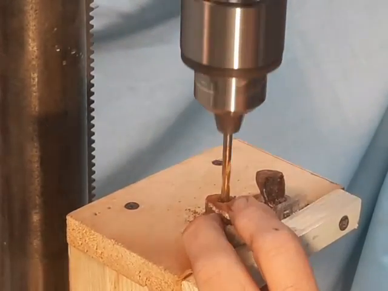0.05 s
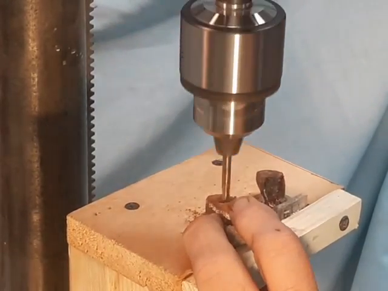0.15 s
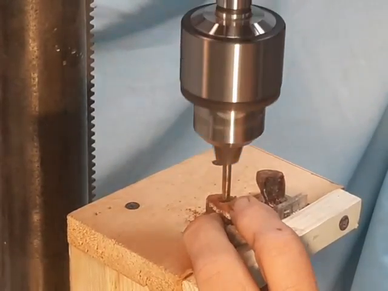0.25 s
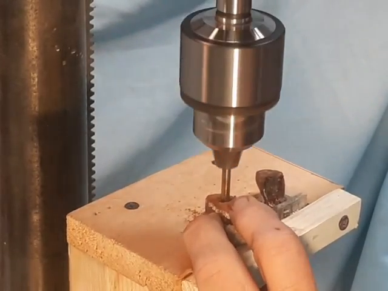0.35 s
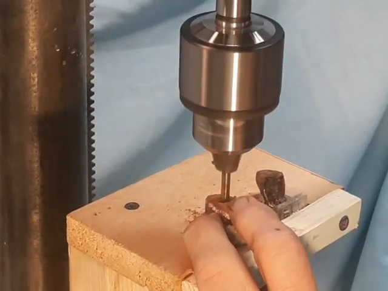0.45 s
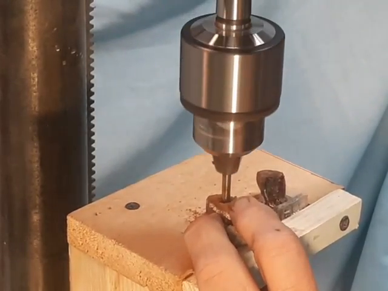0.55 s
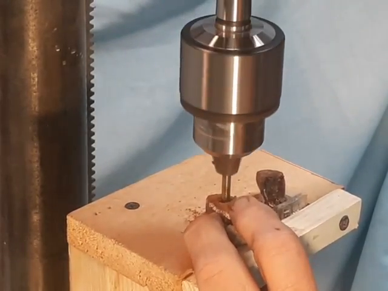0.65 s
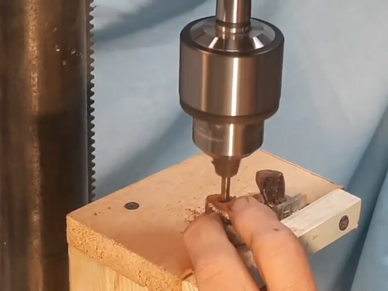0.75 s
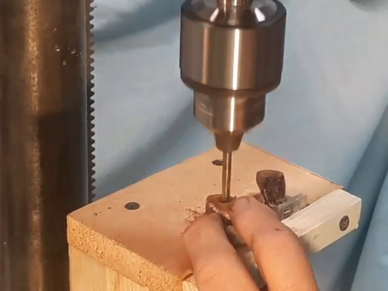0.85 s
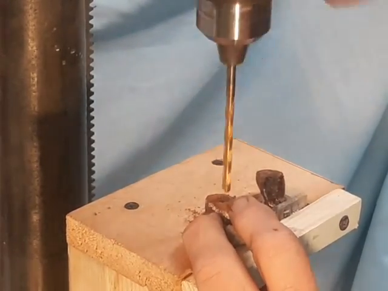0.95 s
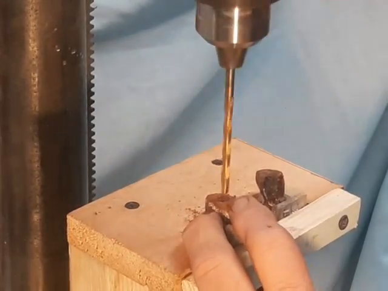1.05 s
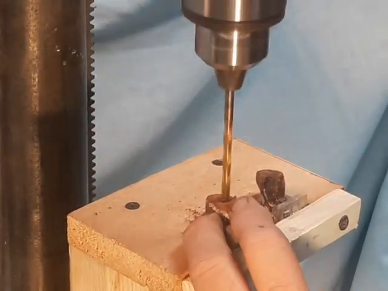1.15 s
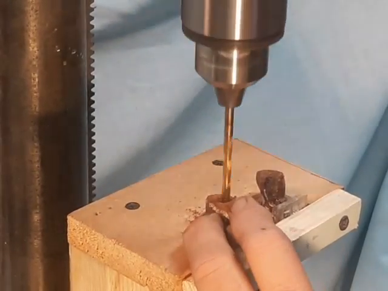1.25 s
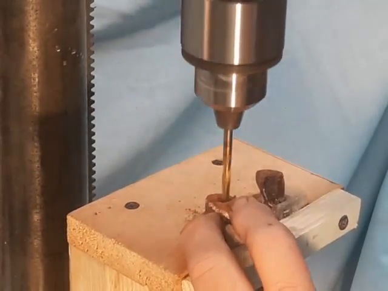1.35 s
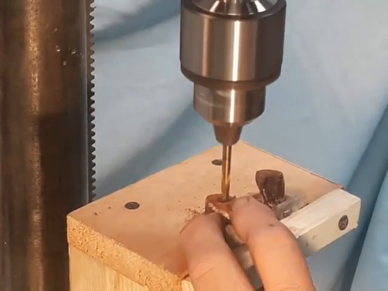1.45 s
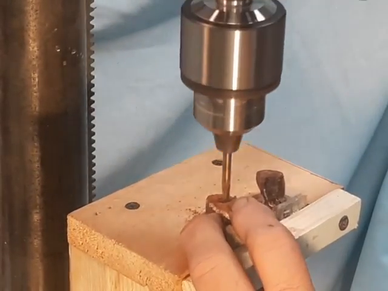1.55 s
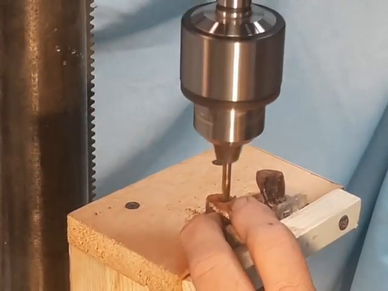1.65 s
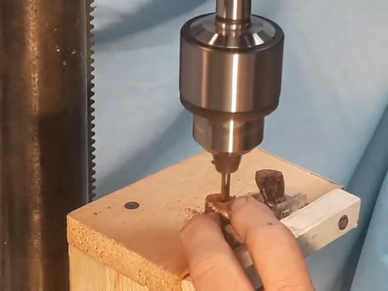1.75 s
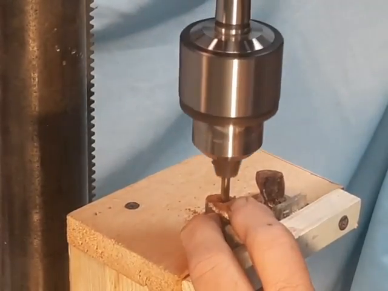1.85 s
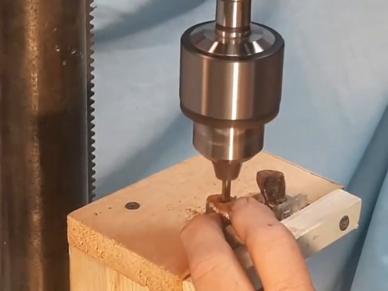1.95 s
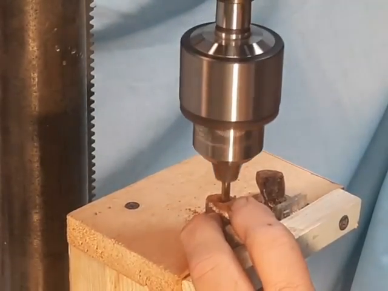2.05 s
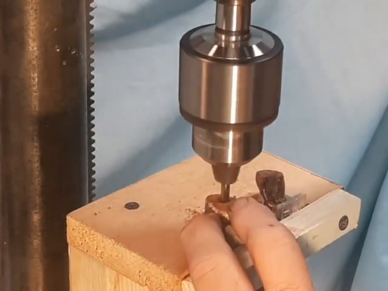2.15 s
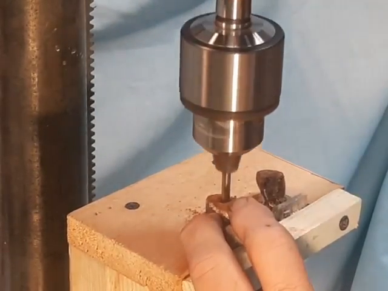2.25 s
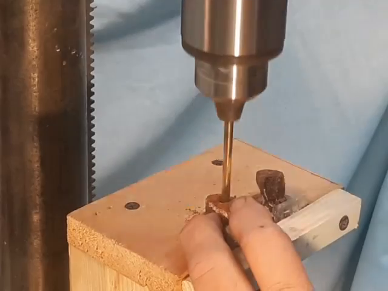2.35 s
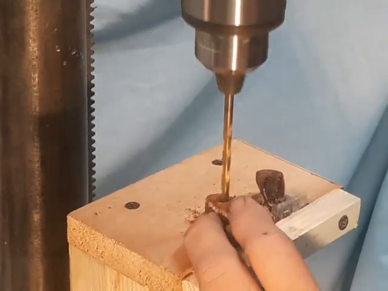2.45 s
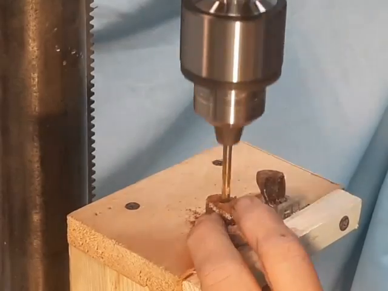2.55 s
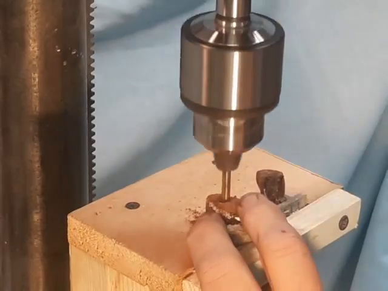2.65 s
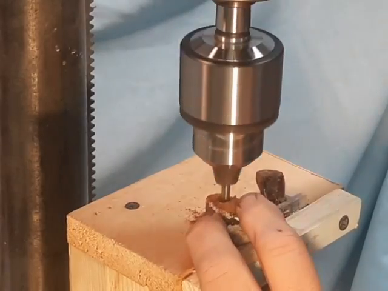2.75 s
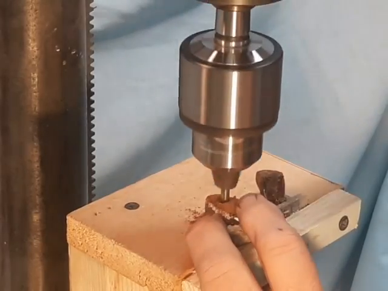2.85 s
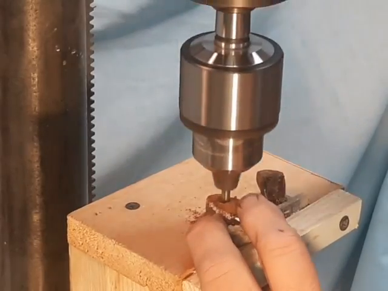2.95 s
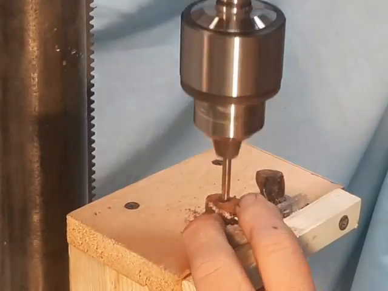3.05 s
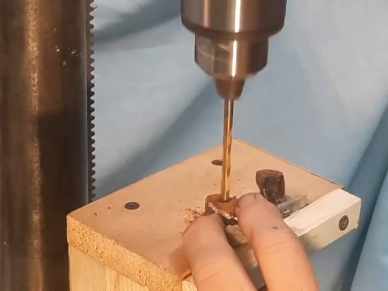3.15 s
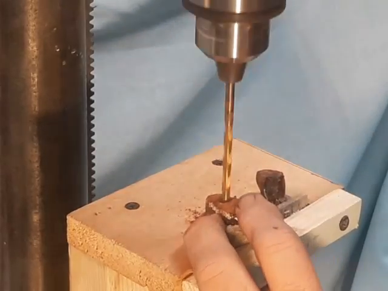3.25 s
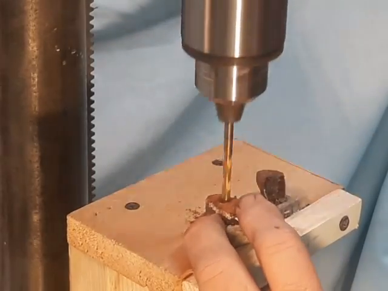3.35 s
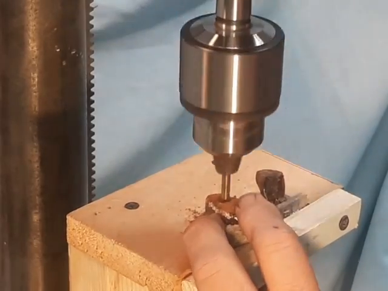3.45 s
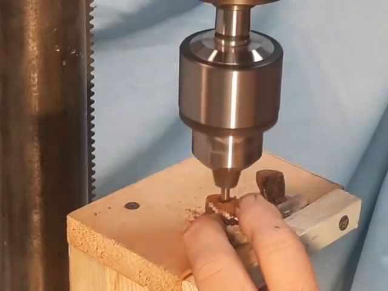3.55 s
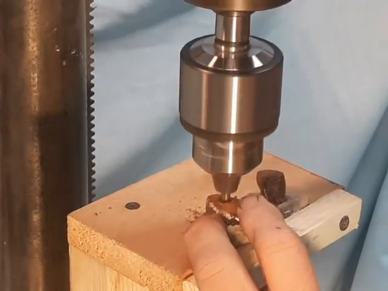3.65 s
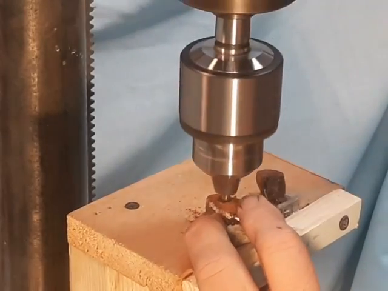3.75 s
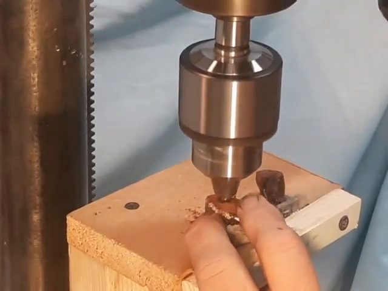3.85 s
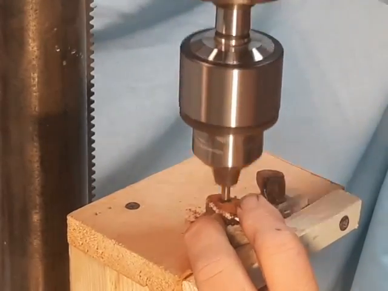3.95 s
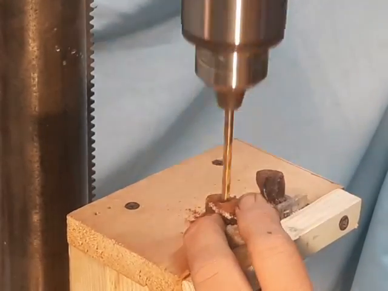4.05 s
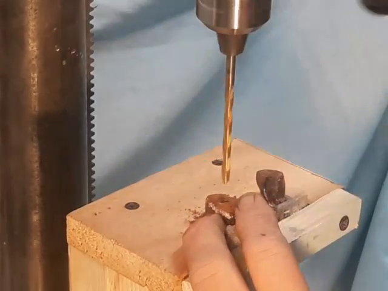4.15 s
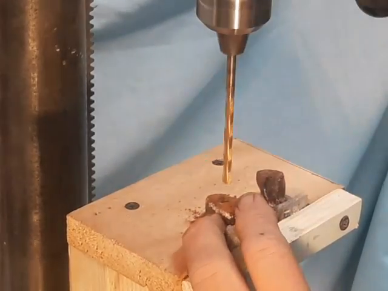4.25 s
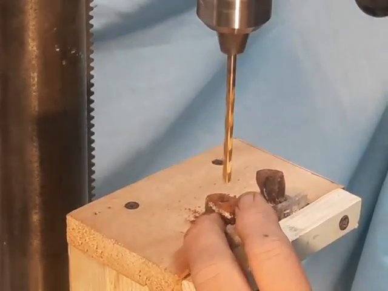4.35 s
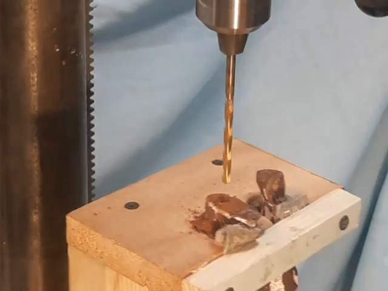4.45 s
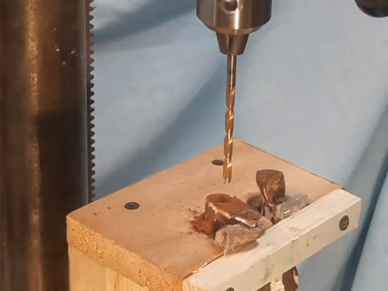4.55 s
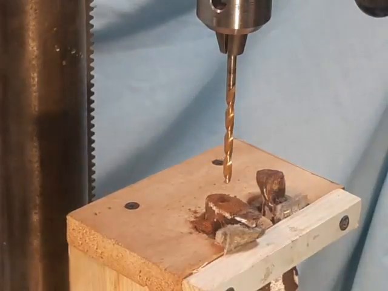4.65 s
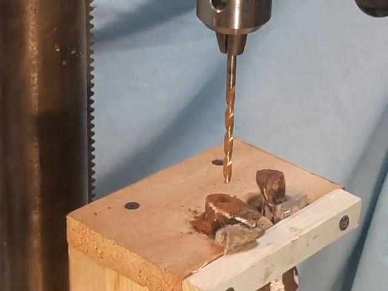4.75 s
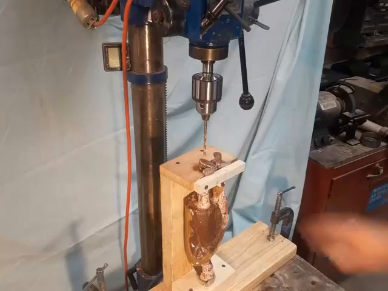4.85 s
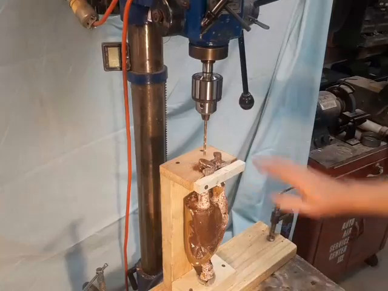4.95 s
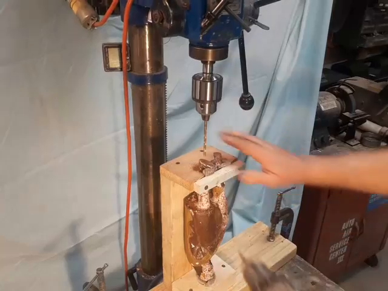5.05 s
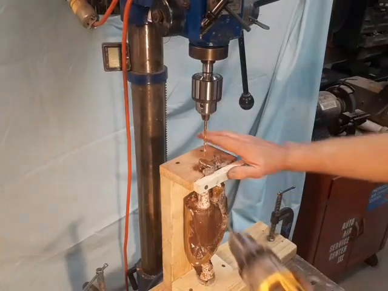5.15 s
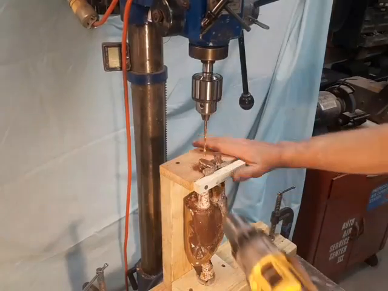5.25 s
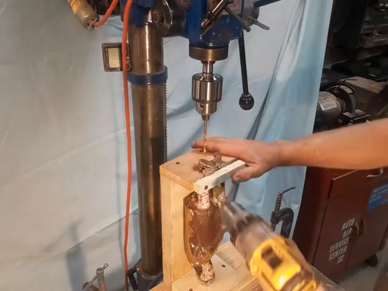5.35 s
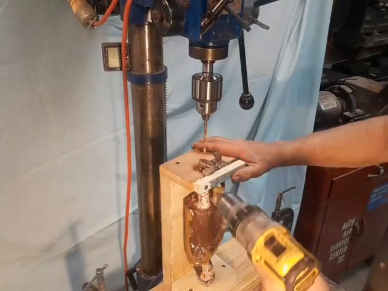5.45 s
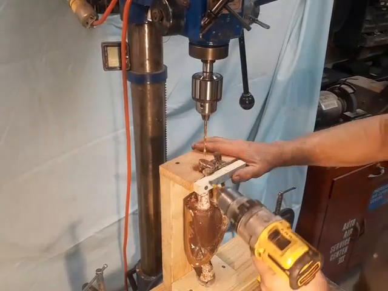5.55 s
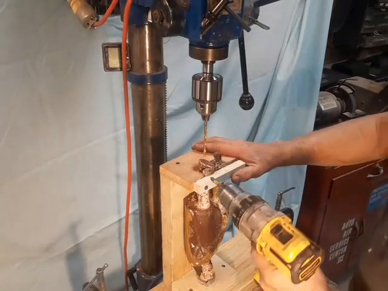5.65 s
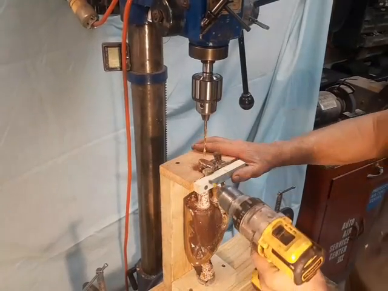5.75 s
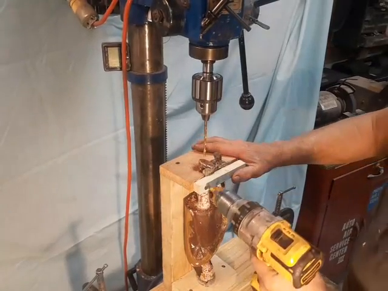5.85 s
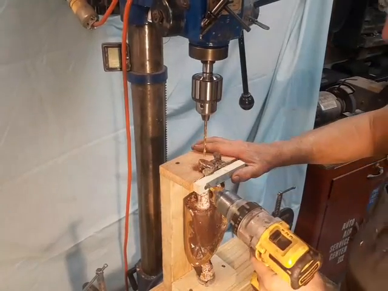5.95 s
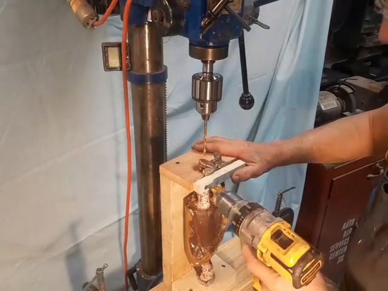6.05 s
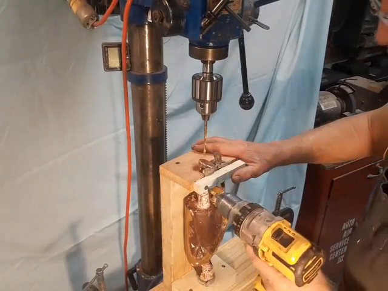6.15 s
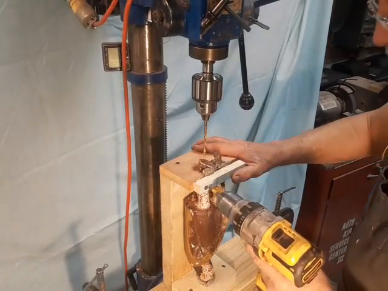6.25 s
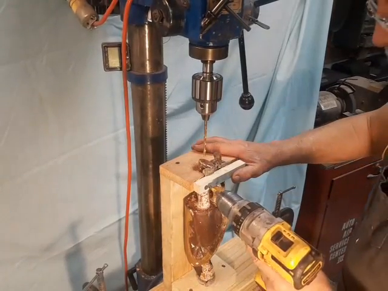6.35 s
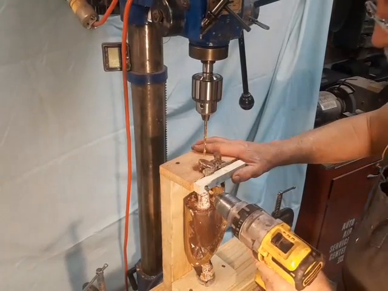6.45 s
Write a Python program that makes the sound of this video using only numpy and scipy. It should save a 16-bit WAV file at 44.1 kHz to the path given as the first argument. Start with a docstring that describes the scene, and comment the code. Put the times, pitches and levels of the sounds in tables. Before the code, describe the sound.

A humming drill press bores into wood with high squeaks and stops, then a cordless driver's bit clicks and scrapes on a screw.

```python
"""A drill press pecks a thin bit into a small piece of wood, in a small workshop. Its motor hums, its
belt and bearings rumble, and the bit's flutes (spiral grooves) rub and hiss. At times the bit sticks
and slips, squeaking once a turn. The press falls silent. A hand lands on the wooden jig (the holder
for the work) and slides over it. Then the steel bit of a cordless driver clicks and scrapes against
a screw in the jig, which thuds along."""
import sys
import numpy as np
from scipy import signal
from scipy.fft import rfft, irfft, next_fast_len
from scipy.io import wavfile
from scipy.ndimage import uniform_filter1d

SR = 44100
rng = np.random.default_rng(int(sys.argv[2]) if len(sys.argv) > 2 else 0)


def int16_out(signal):
    """Quantize to a 16-bit WAV file."""
    q = np.round(np.clip(np.atleast_2d(signal).T, -1, 1) * 32767)
    wavfile.write(sys.argv[1], SR, q.astype(np.int16))


N = 287091
TIME = np.arange(N) / SR
SPINDLE_HZ = 47.2   # turns of the drill bit each second


def drill_press():
    """The running machine; its rattle and hiss swell once with every turn of the bit."""
    rumble, rattle, hum, hiss = press_levels()
    turn = np.sin(wavering_phase(SPINDLE_HZ, wobble=0.013, rate=2.1))
    return belt(rumble) + bearings(rattle, turn) + motor(hum) + flutes(hiss, turn) + binding_bit()


# Spells when the hum swells and the rumble, rattle and hiss grow louder:
# (start [s], swell lasts [s], rubbing lasts [s], rubbing [dB], rattle rise [dB])
SURGES = [(-0.03, .36, 0.45, -62.5, 3), (0.51, .62, .66, -58.5, 3), (1.29, 0.27, 0.24, -59.5, 2.5),
          (2.02, 0.2, .23, -58, 2), (2.55, .14, 0.385, -59.5, 2.5), (3.38, 0.12, 0.604, -60.5, 2.5),
          (4.33, 0.081, 0.13, -64, 1.2)]
# Dull thuds of the feed, which lowers the bit: (time [s], level [dB])
FEED_THUDS = [(0.57, -56), (2.11, -57), (3.41, -52.5), (4.48, -48)]
# Brief rasps of the flutes and the feed: (time [s], level [dB])
BRIEF_RASPS = [(0.532, -54), (2.17, -51.5), (2.775, -54.5), (4.425, -55), (4.524, -60)]


def press_levels():
    """Loudness over time: rumble, rattle, hum and hiss rise in surges; at the stop all die away."""
    swell, rattle_db, rub_power = 0, -53.5, from_db(-59.5) ** 2   # between surges
    for start, swell_s, rub_s, rub_db, rise_db in SURGES:
        swelling = gate(start, start + swell_s, ramp_s=0.09)
        rubbing = gate(start, start + rub_s, ramp_s=0.083)
        swell = swell + swelling
        rattle_db = rattle_db + rise_db * (swelling + rubbing) / 2
        rub_power = rub_power + (from_db(rub_db) * rubbing) ** 2
    stop_s = 4.485
    running = dying(stop_s, db_per_s=295)
    rumble_power = from_db(-53 + 1.5 * swell) ** 2 + bumps(FEED_THUDS, length_s=0.055)
    rumble = np.sqrt(rumble_power) * dying(stop_s, db_per_s=225)
    hum = from_db(-67) * (1 + (from_db(12) - 1) * swell) * running
    rub_power = rub_power * dying(4.46, db_per_s=252) ** 2   # the hiss fades first
    hiss = np.sqrt(rub_power + bumps(BRIEF_RASPS, length_s=0.031))
    return rumble, from_db(rattle_db) * running, hum, hiss


def motor(level):
    """The motor hums at the mains hum pitch, slightly out of step between the ears."""
    phase = wavering_phase(hz=119.7, wobble=0.0027, rate=8)
    return level * np.sin(phase + np.array([[0], [0.9]]))


# Tone colour of the belt's rumble: (frequency [Hz], level [dB])
BELT_SPECTRUM = [(30, -44), (60, -25), (100, -19.5), (150, -14), (200, -8.5), (250, 0.5), (330, -1.5),
                 (430, -1), (520, -3.5), (620, -6.5), (760, -10.5), (900, -10.5)]


def belt(level):
    """The drive belt makes a low, unsteady rumble, louder on the right."""
    flutter = from_db(0.5 + 1.84 * drift(40))
    return level * flutter * coloured(BELT_SPECTRUM, alike=0.058) * ears(1, 2.6)


# Tone colour of the bearings' rattle: (frequency [Hz], level [dB])
BEARING_SPECTRUM = [(410, -32), (700, -6), (753, -10), (851, -7), (1100, -0.5), (1310, -11.5), (1630, -6.5),
                    (2010, -9.5), (2130, -10.5), (2240, -6.5), (2350, -5.5), (2620, -10), (3000, -22.5),
                    (3900, -56), (6600, -120)]
# Ringing notes of the press's metal body: (pitch [Hz], width [Hz], level [dB])
BODY_NOTES = [(473, 4.4, -6.5), (681, 19, -16.5), (1020, 49, -10), (1102.6, 22, -9.5), (2303, 42, -9.5)]


def bearings(level, turn):
    """The bearings rattle, while loose parts knock unevenly and keep the metal body ringing."""
    flutter = from_db(-1.24 + drift(120) + 0.31 * turn)
    rattle = flutter * coloured(BEARING_SPECTRUM, alike=0.0079)
    knocking = from_db(3.33 * drift(60)) * stereo_noise(0.17)
    body = sum(from_db(db) * rms_one(resonate(knocking, hz, width)) for hz, width, db in BODY_NOTES)
    return level * (rattle + body) * ears(0.6, 2.8)


# Tone colour of the flutes' hiss: (frequency [Hz], level [dB])
FLUTE_SPECTRUM = [(1470, -48), (2500, -4), (2810, -7.5), (3130, -5.5), (4440, 0.5), (5150, -5.5), (5560, 0),
                  (6350, 1), (6700, 0.5), (7710, -13), (9360, -14.5), (11400, -9), (13300, -10.5),
                  (15200, -11), (16000, -14.5)]


def flutes(level, turn):
    """The bit's spiral grooves rub the wood and hiss, swelling once a turn."""
    return level * from_db(8.5 + 1.3 * drift(200) + turn) * coloured(FLUTE_SPECTRUM, alike=0.014)


# Times when the bit is tight in the hole: (start [s], end [s], final level [dB])
TIGHT_SPELLS = [(2.78, 3.001, -47), (3.557, 3.968, -40.5)]
# The thin bit's own ringing note: (pitch [Hz], width [Hz], level [dB])
DRILL_BIT_NOTE = [(5140, 870, -6.5)]


def binding_bit():
    """Deep in the hole the bit rubs and sings roughly, ever louder until it is lifted."""
    hz, width, ring_db = DRILL_BIT_NOTE[0]
    singing = rms_one(resonate(resonate(stereo_noise(0.12), hz, width), hz, width))
    growth_db_per_s = 26
    level = sum(from_db(db - growth_db_per_s * np.abs(end - TIME)) * gate(start, end, ramp_s=0.012)
                for start, end, db in TIGHT_SPELLS)
    return level * from_db(ring_db + 2.8 * drift(250)) * singing


# Runs of squeaks: (start [s], end [s], first level [dB], last level [dB],
# first pitch [Hz], last pitch [Hz])
SLIP_RUNS = [(0.248, 0.2708, -33.5, -29.5, 5930, 6020), (0.2922, 0.314, -29, -37, 6070, 6360),
             (0.3353, 0.46, -35, -37.5, 6450, 6300), (0.5705, 0.59, -43, -38, 5700, 5520),
             (1.478, 1.5005, -40, -27.5, 4950, 4800), (1.5232, 1.5678, -36, -33.5, 4680, 4870),
             (1.6203, 1.6414, -33, -29.5, 5640, 5160), (1.6613, 1.6624, -34.5, -35.5, 2750, 2740),
             (1.6674, 1.6903, -36, -28, 5790, 5680), (1.711, 1.711, -33.5, -33.5, 5000, 4930),
             (1.716, 1.765, -38, -35, 3550, 3960), (1.7572, 1.7960, -36, -35.5, 6130, 6480),
             (2.202, 2.2237, -38, -37, 5450, 5350), (2.588, 2.6072, -38, -34.5, 4730, 4630),
             (2.627, 2.627, -34.5, -35, 3860, 3880), (2.65, 2.667, -40, -38, 6170, 6200),
             (2.8, 2.9267, -36.5, -29.5, 5010, 5010), (2.9502, 2.9914, -32.5, -33, 4675, 4803),
             (3.438, 3.494, -41.5, -36.5, 3500, 3620), (3.561, 3.6255, -34, -32, 5320, 5280),
             (3.567, 3.588, -36.5, -32.5, 3950, 4340), (3.651, 3.686, -39, -37, 4570, 4744),
             (3.7277, 3.7484, -34, -37, 4840, 4570), (3.771, 3.9414, -30, -33.5, 4880, 5097),
             (3.863, 3.96, -38, -34, 4650, 4460)]


def bit_slips():
    """The bit sticks and slips once a turn; gives rows of (time [s], level [dB], pitch [Hz])."""
    slip, rebound = (0, 0, 0), (0.006, -11, -0.08)   # it catches again, weaker and lower
    rows = []
    for run in SLIP_RUNS:
        first, last = run[::2], run[1::2]
        turns = 1 + int(round((last[0] - first[0]) * SPINDLE_HZ))
        s, db, hz = np.linspace(first, last, turns).T
        for late_s, change_db, octaves in (slip, rebound):
            louder, higher = rng.standard_normal((turns, 2)).T
            rows += zip(s + late_s, db + change_db + 0.5 * louder, hz * 2 ** (octaves + 0.024 * higher))
    return rows


def squeaks(length_s, rough, glide, overtone_db, rasp_db, ear_phase):
    """Each slip of the bit is a short, swelling, raspy tone of unsteady pitch."""
    out, waver = np.zeros((2, N)), drift(1500)
    rasp = even(from_db(rasp_db * drift(600)), window_s=0.0067)
    slips = bit_slips()
    for (s, db, hz), (stretch, bend, shift) in zip(slips, rng.standard_normal((len(slips), 3))):
        count = int(length_s * np.exp(0.15 * stretch) * SR)
        start = int((s + 0.0022) * SR) - count // 2
        span = slice(start, start + count)
        pitch = hz * (1 + glide * bend * np.linspace(-1, 1, count) + rough * waver[span])
        # bounces off the table put the two ears out of step
        ear_shift = ear_phase * np.tanh(shift) * np.array([[1], [-1]])
        phase = 2 * np.pi * np.cumsum(pitch) / SR + ear_shift
        tone = np.sin(phase) + from_db(overtone_db) * np.sin(2 * phase)
        out[:, span] += from_db(db) * np.hanning(count) ** 2 * tone
    return from_db(-1.2) * workshop(out * rasp, wet_db=-10, early_db=-7)


# Knocks of the feed lever, hand and driver: (time [s], jig level [dB], jig tone [Hz],
# chuck level [dB], chuck tone [Hz], steel level [dB], steel tone [Hz])
KNOCK_EVENTS = [(4.4758, -45.5, 301, -47.5, 1420, -52, 6240), (4.523, -52, 600, -57.5, 3065, -50.5, 4100),
                (4.6876, -81, 603, -77.5, 2730, -67, 6300), (4.8827, -65, 250, -63, 2260, -46, 6270),
                (4.898, -70, 400, -60, 2220, -50, 6500), (5.1605, -47, 622, -52, 1200, -44, 6680),
                (5.5605, -54.5, 1160, -57.5, 2700, -48, 6220), (5.9139, -40, 730, -50, 3280, -23.5, 5800),
                (5.9365, -44, 940, -54, 3290, -36, 5660), (5.9469, -39, 272, -42.5, 1220, -44, 4360),
                (6.0164, -46, 764, -62, 3260, -29.5, 5630), (6.0505, -49, 800, -56, 3230, -39, 5480),
                (6.127, -34, 540, -58, 3210, -32, 5060), (6.1476, -37.5, 842, -57, 1200, -47, 5310),
                (6.1543, -46, 493, -44.5, 2960, -53, 3750), (6.212, -46.5, 407, -30.5, 2470, -28.5, 6750),
                (6.268, -48, 1150, -37, 2060, -42, 3820), (6.329, -44.5, 480, -60, 1230, -74, 3880),
                (6.3895, -48, 820, -53, 3220, -49, 5350), (6.4182, -50, 514, -50, 3490, -43.5, 5300)]
# Ringing notes of the wooden jig, the chuck (the clamp for the bit) and the driver's steel bit:
# (pitch [Hz], level [dB], time to fade by 60 dB [s])
JIG_NOTES = [(175, -1, 0.023), (282, -15, 0.28), (348.6, -10.5, 0.11), (432, -14, 0.18), (501, -10.5, .12),
             (612, -9, 0.048), (740, -9.5, .05), (846, -6, 0.061), (1020, -6.5, 0.027), (1240, -1, 0.0091)]
CHUCK_NOTES = [(1166, -1, 0.013), (1850, -1, 0.0077), (2130, -8, 0.0088), (2330, -6, 0.01),
               (2444, -17, 0.09), (2790, -2.5, 0.014), (2836, -19, 0.067), (3065, 0, 0.011)]
STEEL_NOTES = [(3000, 1.5, 0.0036), (3560, 1, 0.0065), (4117, -4, 0.014), (4554, -5, 0.024),
               (5160, -2.5, 0.0069), (5710, -9.5, 0.018), (6250, -5.5, 0.016), (6480, -5.5, 0.0083)]


def driver_and_jig():
    """Knocks ring the steel bit and chuck, and the heavy jig a moment later; scrapes join in."""
    s, jig_db, jig_hz, chuck_db, chuck_hz, steel_db, steel_hz = np.transpose(KNOCK_EVENTS)
    jig_rub, steel_rub = scrapes()
    jig = jig_rub + strike(JIG_NOTES, s + 0.001966, jig_db + 6, jig_hz, octaves=0.3, scatter_db=4)
    chuck = strike(CHUCK_NOTES, s, chuck_db + 6.5, chuck_hz, octaves=0.095, scatter_db=3.5)
    steel = steel_rub + strike(STEEL_NOTES, s, steel_db + 4.5, steel_hz, octaves=0.18, scatter_db=0.5)
    crack = cracks(s, from_db(chuck_db - 15) + from_db(steel_db - 20.5), fade_s=0.0012)
    return (workshop(high_pass(jig, hz=217), wet_db=-4.5, early_db=-14) * ears(-0.6, 0.6)
            + workshop(high_pass(chuck, hz=780) + crack, wet_db=-0.5, early_db=7) * ears(-1.1, 0.9)
            + workshop(high_pass(steel, hz=2410), wet_db=-5.5, early_db=1.5) * ears(-0.4, 0.4))


def strike(notes, times, levels_db, tones_hz, octaves, scatter_db):
    """Each blow sets all of an object's notes ringing, each with a strength of its own."""
    hz, note_db, fade_s = np.transpose(notes)
    t, out = TIME[:SR // 3], np.zeros(N + SR)
    rings = np.sin(2 * np.pi * np.outer(hz, t)) * np.exp(-np.log(1000) * np.outer(1 / fade_s, t))
    signs = (-1) ** np.arange(len(hz))
    for s, db, tone_hz in zip(times, levels_db, tones_hz):
        luck_db = scatter_db * rng.standard_normal(len(hz))
        strength = signs * from_db(db + note_db + luck_db) * tone_weight(hz, tone_hz, octaves)
        out[int(s * SR):int(s * SR) + len(t)] += strength @ rings
    return out[:N]


def cracks(times, strengths, fade_s):
    """The first touch of each knock is a short, gritty crack."""
    touches = np.zeros(N)
    touches[(times * SR).astype(int)] = strengths
    level = signal.lfilter([1], [1, -np.exp(-1 / (fade_s * SR))], touches + 1e-18)
    return high_pass(level * rng.standard_normal(N), hz=3500)


# The driver's bit skates on the screw head, one list for each stroke:
# (time [s], jig level [dB], jig tone [Hz], steel level [dB])
SCRAPE_STROKES = [
    [(6.035, -42, 703, -58), (6.045, -53.5, 740, -48.5), (6.121, -38, 497, -48), (6.129, -45, 502, -41),
     (6.161, -31, 475, -56), (6.195, -64, 448, -76)],
    [(6.365, -64, 690, -80), (6.377, -40, 690, -55.5), (6.419, -43, 655, -44.5), (6.437, -67, 612, -69),
     (6.45, -62, 581, -61)],
]


def scrapes(impacts_per_s=4900):
    """The skating bit's tiny impacts make the steel hiss; the jig groans, sinking over each stroke."""
    impacts = (rng.random(N) < impacts_per_s / SR) * rng.choice([-1, 1], N)
    skating = impacts * from_db(5 * drift(150))
    jig_rings = ring(skating, JIG_NOTES)
    hiss = even(sum(ring(skating, STEEL_NOTES)), window_s=0.013)
    jig, steel = 0, 0
    for stroke in SCRAPE_STROKES:
        s, jig_db, tone_hz, steel_db = np.transpose(stroke)
        tone = np.interp(TIME, s, tone_hz)
        groan = sum(wave * tone_weight(hz, tone, octaves=0.16)
                    for wave, (hz, _, _) in zip(jig_rings, JIG_NOTES))
        jig = jig + from_db(-4) * level_curve(s, jig_db) * even(groan, window_s=0.015)
        steel = steel + from_db(-3.5) * level_curve(s, steel_db) * hiss
    return jig, steel


# Brushes over the jig: (time [s], rise [s], hold [s], dull rub [dB], slide [dB], sleeve swish [dB])
HAND_STROKES = [(4.837, .003, 0.025, -85, -67.5, -68), (4.877, 0.014, 0.017, -85, -66, -57.5),
                (4.95, .04, .025, -92, -81, -76), (5.139, 0.017, 0.0093, -49.5, -61, -66),
                (5.159, 0.02, 0.0096, -52.5, -49, -45.5), (5.278, 0.061, 0.034, -69, -65, -61.5),
                (5.398, 0.089, 0.051, -76, -57.5, -62.5), (5.541, 0.011, 0.026, -66, -58, -61)]
# Tone colours of the dull rub, the slide and the sleeve's swish: (frequency [Hz], level [dB])
RUB_SPECTRUM = [(350, -10), (480, -8), (620, 2), (800, -3), (1000, -1), (1700, -7)]
SLIDE_SPECTRUM = [(750, -14), (1000, -5), (1400, -4.5), (2000, -2), (3000, 0.5), (4200, 0), (5500, -7.5)]
SLEEVE_SPECTRUM = [(4500, -9.5), (5800, -1), (6800, 2.5), (7600, -15), (9500, -11), (13000, -9),
                   (16000, -12)]


def hand():
    """Skin and sleeve brush over the grain of the wood; each stroke rises, holds and dies away."""
    power = 0
    for s, rise_s, hold_s, *levels_db in HAND_STROKES:
        rising = from_db(20 * np.clip((TIME - s) / rise_s, -10, 0))
        power = power + np.outer(from_db(levels_db), rising * dying(s + hold_s, db_per_s=260)) ** 2
    rub, slide, swish = np.sqrt(power)
    grain = from_db(1.3 * drift(500))
    return grain * (rub * from_db(2.5) * coloured(RUB_SPECTRUM, alike=0.4)
                    + slide * from_db(1.5) * coloured(SLIDE_SPECTRUM, alike=0.13)
                    + swish * from_db(2.5) * coloured(SLEEVE_SPECTRUM, alike=0.11))


# Loudness of the workshop's still air: (time [s], level [dB])
AIR_LEVELS = [(0, -77.5), (4.82, -85), (4.84, -69), (6.51, -66.5)]
# Tone colour of that air: (frequency [Hz], level [dB])
AIR_SPECTRUM = [(21, -35), (35, -11.5), (82, -11), (129, -10), (151, -19.5), (245, -19.5), (325, -36),
                (370, -28), (1170, -41.5), (1300, -36.5), (1860, -39.5), (8010, -43.5), (14800, -36.5),
                (16000, -52.5)]


def still_air():
    """A faint, low hush that steps up suddenly at 4.83 s."""
    return level_curve(*np.transpose(AIR_LEVELS)) * coloured(AIR_SPECTRUM, alike=0.55)


def workshop(x, wet_db, early_db, fade_s=0.28):
    """The room adds quick echoes off the bench and a soft tail, different at each ear."""
    t = TIME[:SR // 2]
    early = rms_one(rng.standard_normal((2, len(t))) * np.exp(-t / 0.0048) * (t > 0.0006))
    tail = rms_one(rng.standard_normal((2, len(t))) * np.exp(-np.log(1000) * t / fade_s) * (t > 0.004))
    echoes = (from_db(early_db) * early + from_db(wet_db) * tail) / np.sqrt(len(t))
    return x + signal.fftconvolve(np.atleast_2d(x), echoes, axes=1)[:, :N]


def from_db(db):
    """Turn decibels into a gain, the number to multiply a sound by."""
    return np.exp(np.asarray(db) * (np.log(10) / 20))


def ears(left_db, right_db):
    """A gain for each ear."""
    return from_db([[left_db], [right_db]])


def rms_one(x):
    """Scale a sound to an average power of 1."""
    return x / np.sqrt(np.mean(x ** 2) + 1e-20)


def even(x, window_s):
    """Steady pressure keeps a rubbed object at an even level, with power near 1."""
    return x / np.sqrt(np.abs(uniform_filter1d(x * x, int(window_s * SR) + 1)) + 1e-12)


def level_curve(times, levels_db):
    """A gain that passes through the given points and is silent outside them."""
    return from_db(np.interp(TIME, times, levels_db, left=-140, right=-140))


def gate(start, end, ramp_s):
    """1 between start and end, with a straight ramp across each edge."""
    return np.clip(0.5 + np.minimum(TIME - start, end - TIME) / ramp_s, 0, 1)


def dying(stop_s, db_per_s):
    """Full gain until the stop, then a steady fall."""
    return from_db(-db_per_s * np.clip(TIME - stop_s, 0, 1))


def bumps(rows, length_s):
    """The power of short, smooth swells, from rows of (time [s], level [dB])."""
    return sum(from_db(db) ** 2 * np.exp(-2 * (2 * (TIME - s) / length_s) ** 2) for s, db in rows)


def drift(rate):
    """A random wander of about 1 either way, taking `rate` new values a second."""
    points = rng.standard_normal(int(N / SR * rate) + 2)
    return rms_one(np.interp(TIME * rate, np.arange(len(points)), points))


def wavering_phase(hz, wobble, rate):
    """The angle of a cycle whose speed wanders a little."""
    return 2 * np.pi * np.cumsum(hz * (1 + wobble * drift(rate))) / SR


def stereo_noise(alike):
    """White noise; the share `alike` is the same in both ears."""
    return np.sqrt(alike) * rng.standard_normal(N) + np.sqrt(1 - alike) * rng.standard_normal((2, N))


def coloured(spectrum, alike):
    """Stereo noise with the given tone colour, falling steeply beyond the table's ends."""
    size = next_fast_len(N)
    octave = np.log2(np.maximum(np.arange(size // 2 + 1) * SR / size, 1))
    hz, db = np.transpose(spectrum)
    beyond = np.abs(octave - np.clip(octave, np.log2(hz[0]), np.log2(hz[-1])))
    colour = from_db(np.interp(octave, np.log2(hz), db) - 48 * beyond)
    return rms_one(irfft(rfft(stereo_noise(alike), size) * colour, size)[:, :N])


def resonate(x, hz, width):
    """Let through only the sound near one pitch."""
    r = np.exp(-np.pi * width / SR)
    feedback = [1, -2 * r * np.cos(2 * np.pi * hz / SR), r * r]
    return signal.lfilter(np.array([1, 0, -1]) * (1 - r * r) / 2, feedback, x)


def ring(force, notes):
    """A force sets an object ringing: one wave for each note, every second one flipped."""
    waves = []
    for k, (hz, db, fade_s) in enumerate(notes):
        r, step = np.exp(-np.log(1000) / (fade_s * SR)), 2 * np.pi * hz / SR
        wave = signal.lfilter([0, np.sin(step)], [1, -2 * r * np.cos(step), r * r], force + 1e-18)
        waves.append((-1) ** k * from_db(db) * wave)
    return waves


def tone_weight(hz, tone_hz, octaves):
    """The spot that is touched favours the notes near one tone."""
    return 1 / np.sqrt(1 + (np.log2(hz / tone_hz) / octaves) ** 2)


def high_pass(x, hz):
    """Small objects give off little bass."""
    return signal.sosfilt(signal.butter(2, hz, "high", fs=SR, output="sos"), x)


def scene():
    """The press and its squeaking bit, then the hand and the driver, over still air."""
    air = still_air()
    press = drill_press()
    squeaking = squeaks(length_s=0.012, rough=0.04, glide=0.031, overtone_db=-20, rasp_db=3,
                        ear_phase=1.42)
    return press + squeaking + hand() + driver_and_jig() + air


def record(dry):
    """The very highest treble is cut off steeply."""
    cutoff_hz = 15900
    return signal.sosfilt(signal.ellip(10, 0.1, 70, cutoff_hz, fs=SR, output="sos"), dry)


dry = scene()
out = record(dry)
int16_out(out)
```